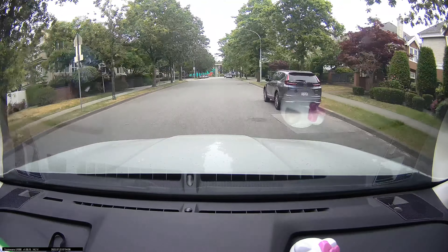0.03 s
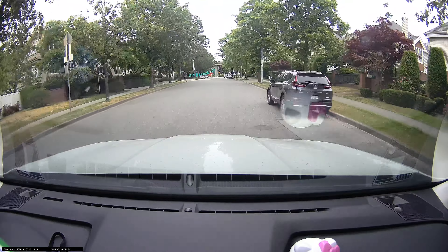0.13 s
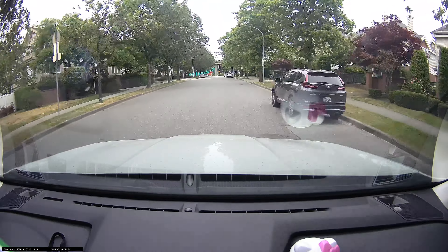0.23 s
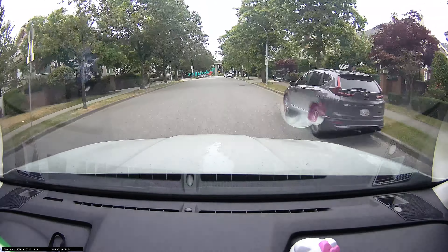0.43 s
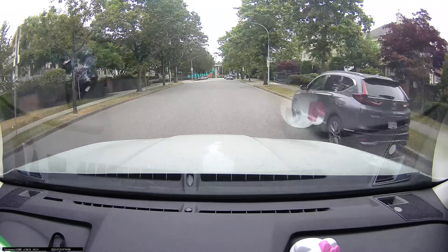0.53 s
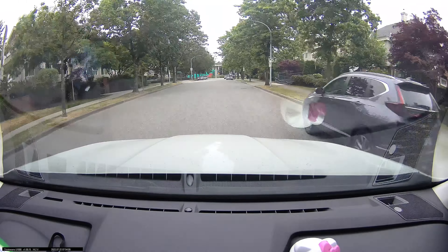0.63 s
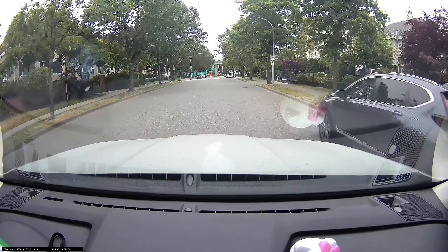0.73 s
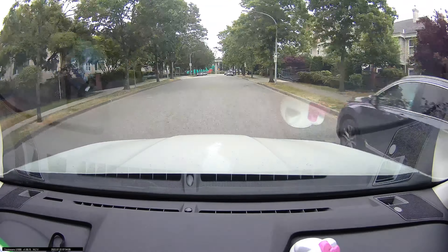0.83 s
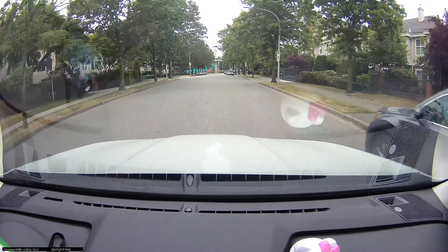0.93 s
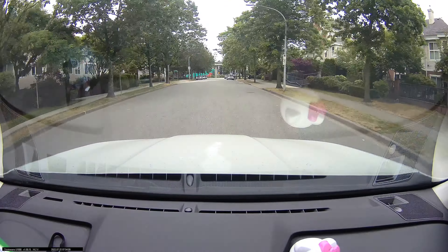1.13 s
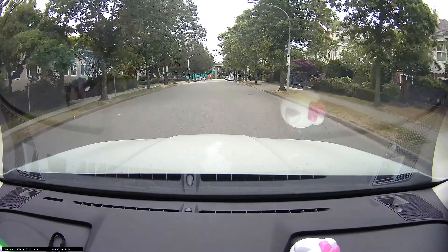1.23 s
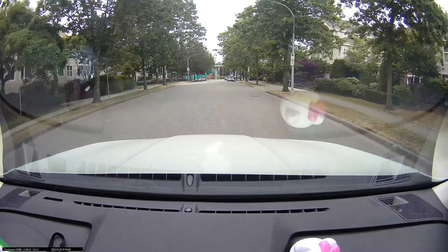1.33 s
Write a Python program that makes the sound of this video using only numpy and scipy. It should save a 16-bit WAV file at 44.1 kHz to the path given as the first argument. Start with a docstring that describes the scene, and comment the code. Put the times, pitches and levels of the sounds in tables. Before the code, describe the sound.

A car goes over a bump with a hard clunk, heard from inside the cabin. The trim rattles faintly and a duller thud follows, while the tyres keep up a low rumble on the street.

```python
"""Bumps heard inside a car

A car rolls along a street: the tyres rumble, and each jolt excites the cabin's lowest mode as a boom.
At the first bump a loose part knocks once, then lands with a hard clunk of several quick contacts.
A duller thud follows, as from the rear wheels, and the shaken trim rattles faintly.
Impacts are modelled as impulses driving damped modes, together with decaying noise."""
import sys
import numpy as np
from scipy import signal
from scipy.io import wavfile

SR = 44100
rng = np.random.default_rng(int(sys.argv[2]) if len(sys.argv) > 2 else 0)


def wav_record(signal):
    """Record a signal, one row per channel, as 16-bit PCM in the file named by sys.argv[1]."""
    frames = np.transpose(np.atleast_2d(signal))
    bounded = np.clip(frames, -1, 1)
    # unit amplitude maps onto the largest positive 16-bit level
    quanta = np.round(bounded * 32767).astype(np.int16)
    wavfile.write(sys.argv[1], SR, quanta)


N = 61739
TIME = np.arange(N) / SR

# rumble through the suspension: (frequency [Hz], relative spectral density [dB])
RUMBLE_SPECTRUM = [(20, -2), (34, 2), (45, 0), (65, -8), (85, -16), (110, -18.5), (145, -23), (205, -25.5),
                   (290, -45.5), (600, -51), (3000, -100)]
# its swell on rough patches: (time [s], level [dB])
RUMBLE_SWELL = [(0, -2.5), (0.09, -8.5), (0.14, -1.5), (0.2, -1.5), (0.3, 8.5), (0.39, 2), (0.45, 0.5),
                (0.5, 0), (0.6, 2.5), (0.72, 5.5), (0.85, -5.5), (0.915, -1), (0.955, 4), (1.05, -4.5),
                (1.15, -2), (1.4, -6)]
# tyre roar, muffled by the cabin: (frequency [Hz], relative spectral density [dB])
TYRE_SPECTRUM = [(150, -9), (280, -0.5), (410, 1.5), (520, -1.5), (650, -6.5), (790, -8), (1100, -11.5),
                 (1300, -15.5), (1520, -26), (2000, -26.5), (2600, -32), (3450, -30), (4100, -39.5),
                 (6000, -43.5), (15000, -45)]
# resonances of tyres and cabin: (frequency [Hz], filter bandwidth [Hz], level [dB])
TYRE_HUMS = [(105.8, 28, -39), (249.1, 14, -52.5), (335.3, 44, -48.5)]
# swell of roar and hum: (time [s], level [dB])
TYRE_SWELL = [(0, -1.5), (0.2, -0.5), (0.36, 0.5), (0.45, 0.5), (0.6, -1), (0.72, 1), (0.8, -0.5), (1.1, 0),
              (1.4, -2.5)]
# jolts from the road: (time [s], level [dB])
ROAD_JOLTS = [(0.262, -12), (0.312, -4), (0.353, -20.5), (0.49, -8.5), (0.523, -5), (0.638, -9.5),
              (0.9, -14.5), (0.944, -9), (1.076, -13.5)]
# runs of trim chatter: (time [s], duration [s], level [dB])
RATTLE_RUNS = [(0.199, 0.11, -50.5), (0.29, 0.042, -44.5), (0.476, 0.03, -60), (0.534, 0.051, -53.5),
               (0.612, 0.03, -60.5), (1.245, 0.11, -69)]
# contact noise of the trim: (frequency [Hz], relative spectral density [dB])
TRIM_SPECTRUM = [(700, 9), (1300, 7.5), (2300, -1.5), (2900, -0.5), (3500, -2.5), (4300, -13.5),
                 (7000, -18.5), (15000, -28)]
# modes of the trim: (frequency [Hz], level [dB], T60 [s])
TRIM_RESONANCES = [(3310, -6, .03), (3560, -2, .04), (3730, -4, .035)]
# single trim contacts: (time [s], ring level [dB], clack level [dB])
TRIM_TICKS = [(0.496, -70.5, -53), (0.545, -54, -49.5), (0.5567, -50, -49), (0.5816, -57, -49.5),
              (0.6256, -64.5, -63), (1.273, -59.5, -68)]
# cushioned blows through the suspension: (time [s], level [dB], cutoff [Hz])
SUSPENSION_BLOWS = [(0.2334, -16, 260), (0.2441, -14.5, 170), (0.2845, -5.5, 450), (0.3033, -13.5, 254.5),
                    (0.3203, -12.5, 240), (0.477, -13.5, 85.8), (0.511, -15.5, 163), (0.516, -14.5, 250),
                    (0.604, -23.5, 195), (0.932, -10.5, 65.5), (0.945, -17, 80), (0.966, -17, 80.3),
                    (1.003, -16.5, 68.3), (1.08, -21, 65.9)]
# shudder after a blow: (frequency [Hz], relative spectral density [dB])
SHUDDER_SPECTRUM = [(60, 4.5), (200, 4.0), (500, -5.5), (1000, -31.5), (3000, -45)]
# modes of the body: (frequency [Hz], level [dB], T60 [s])
BODY_MODES = [(87.3, -4, 0.092), (126.7, 1, 0.056), (202.4, -6.5, .12), (319, -5.5, 0.089),
              (382.3, -19, 0.42), (433.7, -19.5, 0.15), (486.4, -11, 0.076), (530.3, -5.5, 0.12),
              (579, -6, 0.045), (650, -7, 0.03), (745, -7, .035), (839, -16, 0.034), (982, -16.5, 0.037),
              (1142, -22.5, 0.072), (1370, -17.5, 0.02), (1544, -22, 0.034)]
# light knocks of the loose part: (time [s], level [dB], cutoff [Hz])
PART_KNOCKS = [(0.2484, -26, 6930), (0.907, -46, 2180)]
# its hollow modes: (frequency [Hz], level [dB], T60 [s])
PART_MODES = [(959, 3, 0.023), (1200, -11, 0.015), (2100, -18.5, .014), (3430, -20, 0.035),
              (3520, -20, 0.032), (6050, -30, 0.036)]
# a faint tick, the click of the first knock, then the clunk's quick contacts:
# (time [s], body level [dB], crack level [dB])
HARD_CONTACTS = [(0.217, -51.5, -37.5), (0.2489, -42, -28.5), (0.2873, -16.5, -18.5), (0.2897, -13, -17.5),
                 (0.2942, -10, -18.5), (0.2967, -32, -9.5), (0.2992, -16, -13), (0.308, -25, -20.5),
                 (0.313, -29.5, -25), (0.319, -30.5, -37), (0.3275, -34, -40)]
# crack of a contact: (frequency [Hz], relative spectral density [dB])
CRACK_SPECTRUM = [(300, 20.5), (700, 17.5), (1500, 2), (2300, -0.5), (3500, -1), (5300, -11.5), (7500, -15),
                  (9400, -13), (10800, -26), (12300, -10), (15500, -27)]
# dull reverberation of the cabin: (frequency [Hz], relative spectral density [dB])
CABIN_SPECTRUM = [(200, 4), (350, 11.5), (600, 7), (900, -20.5), (1500, -19.5), (3000, -40), (12000, -55)]


def from_db(db):
    """Amplitude ratio of a level in decibels."""
    return 10 ** (np.asarray(db) / 20)


def unit_rms(x):
    """Normalisation to an rms of 1."""
    return x / np.sqrt(np.mean(x ** 2) + 1e-20)


def lowpass(x, hz):
    """Second-order Butterworth low-pass."""
    return signal.sosfilt(signal.butter(2, hz, fs=SR, output="sos"), x + 1e-18)


def impulses(times, db):
    """Brief contacts idealised as one-sample impulses."""
    force = np.zeros(N)
    np.add.at(force, (np.asarray(times) * SR).astype(int), from_db(db))
    return force


def resonator(force, hz, t60):
    """Damped oscillator: a unit impulse starts a decaying sine of unit amplitude."""
    r, w = from_db(-60 / (t60 * SR)), 2 * np.pi * hz / SR
    return signal.lfilter([0, np.sin(w)], [1, -2 * r * np.cos(w), r * r], force + 1e-18)


def modes(force, table):
    """Modal superposition, with successive modes in opposite phase."""
    return sum((-1) ** k * from_db(db) * resonator(force, hz, t60)
               for k, (hz, db, t60) in enumerate(table))


def decay(hits, t60):
    """Amplitude envelope of incoherent hits: their energies add and decay exponentially."""
    energy_kept = from_db(-120 / (t60 * SR))
    return np.sqrt(signal.lfilter([1], [1, -energy_kept], hits ** 2 + 1e-18))


def band_noise(spectrum, grains=1):
    """Spectral shaping: quarter-octave noise bands, each flickering by 1 dB, summed to unit rms."""
    hz, db = np.transpose(spectrum)
    edges = 18 * 2 ** (np.arange(41) / 4)
    white, total = rng.standard_normal((2, N)) * grains, 0
    for k, (low, high) in enumerate(zip(edges, edges[1:])):
        band_db = np.interp(np.log(np.sqrt(low * high)), np.log(hz), db)
        flicker_db = unit_rms(lowpass(rng.standard_normal(N + SR), hz=20)[SR:])
        if high > hz[0]:
            looped = np.concatenate([white[k % 2, -SR // 2:], white[k % 2]])   # lets the filter settle
            bandpass = signal.butter(2, [low, high], "band", fs=SR, output="sos")
            total += signal.sosfilt(bandpass, looped)[-N:] * from_db(band_db + flicker_db)
    return unit_rms(total)


def road_rumble():
    """Structure-borne noise: road roughness passes through the suspension at low frequencies."""
    swell_db = np.interp(TIME, *np.transpose(RUMBLE_SWELL))
    return from_db(-23 + swell_db) * band_noise(RUMBLE_SPECTRUM)


def tyre_roar():
    """Random excitation: rolling gives a broad roar and drives narrow resonances into a hum."""
    roar = from_db(-51) * band_noise(TYRE_SPECTRUM)
    for hz, width, db in TYRE_HUMS:
        b, a = signal.iirpeak(hz, hz / width, fs=SR)
        hum = signal.lfilter(b, a, signal.lfilter(b, a, rng.standard_normal(N + SR)))
        roar += from_db(db) * unit_rms(hum[SR:])
    return roar * from_db(np.interp(TIME, *np.transpose(TYRE_SWELL)))


def cabin_boom():
    """Free vibration: the cabin's lowest mode rings on after each jolt."""
    jolts = impulses(*np.transpose(ROAD_JOLTS))
    return lowpass(resonator(jolts, hz=27.68, t60=0.52), hz=94)


def trim_rattle(contacts_per_s=8700, attack_s=0.023, release_s=0.013):
    """Shot noise: tiny random contacts of the shaken trim merge into chatter with a thin ring."""
    touching = rng.random(N) < contacts_per_s / SR
    grains = touching * from_db(np.minimum(rng.exponential(1, N), 4))
    shake = 0
    for start, duration, db in RATTLE_RUNS:
        rise = np.clip((TIME - start) / attack_s, 0, 1)
        fall = np.exp(-np.maximum(TIME - start - duration, 0) / release_s)
        shake += from_db(db) * rise * fall
    ring = unit_rms(modes(grains * rng.choice([-1, 1], N), TRIM_RESONANCES))
    return shake * (band_noise(TRIM_SPECTRUM, grains) + from_db(-14.5) * ring)


def trim_ticks():
    """Impulse response of the trim: each stronger contact gives a dry clack and a short ring."""
    times, ring_db, clack_db = np.transpose(TRIM_TICKS)
    clack = band_noise(TRIM_SPECTRUM) * decay(impulses(times, clack_db), t60=0.025)
    return clack + modes(impulses(times, ring_db), TRIM_RESONANCES)


def suspension_thuds():
    """Cushioning acts as a low-pass: blows excite mainly the low modes and leave a brief shudder."""
    noise = from_db(-12) * band_noise(SHUDDER_SPECTRUM)
    thuds = 0
    for time, db, cutoff_hz in SUSPENSION_BLOWS:
        blow = impulses([time], db)
        shudder = noise * lowpass(decay(blow, t60=0.15), hz=200)
        thuds += lowpass(modes(blow, BODY_MODES) + shudder, cutoff_hz)
    return thuds


def loose_part_knocks():
    """Contact hardness sets bandwidth: the part lifts with a hollow tap; a later, softer one is dull."""
    return sum(lowpass(modes(impulses([time], db), PART_MODES), cutoff_hz)
               for time, db, cutoff_hz in PART_KNOCKS)


def loose_part_clunk(reflection_delay_s=0.011):
    """Hard impacts are broadband: each rings body and cabin, and its crack scatters off the glass."""
    times, body_db, crack_db = np.transpose(HARD_CONTACTS)
    blows = impulses(times, body_db)
    direct = decay(impulses(times, crack_db), t60=0.014)
    reflected = from_db(-18) * decay(impulses(times + reflection_delay_s, crack_db), t60=0.049)
    crack = band_noise(CRACK_SPECTRUM) * lowpass(np.hypot(direct, reflected), hz=930)
    cabin = from_db(-17) * band_noise(CABIN_SPECTRUM) * lowpass(decay(blows, t60=0.27), hz=119.4)
    return modes(blows, BODY_MODES) + crack + cabin


def scene():
    """Superposition of all sources at the windscreen, in one channel."""
    background = road_rumble() + tyre_roar() + cabin_boom()
    impacts = suspension_thuds() + loose_part_knocks() + loose_part_clunk()
    return (background + impacts + trim_rattle() + trim_ticks())[None]


def record(dry, overload=0.69, cutoff_hz=15900):
    """Saturation and band limiting: the microphone clips the largest swings; the top treble is cut."""
    band_limit = signal.ellip(10, 0.1, 80, cutoff_hz, fs=SR, output="sos")
    return signal.sosfilt(band_limit, np.clip(dry, -overload, overload))


dry = scene()
out = record(dry)
wav_record(out)
```